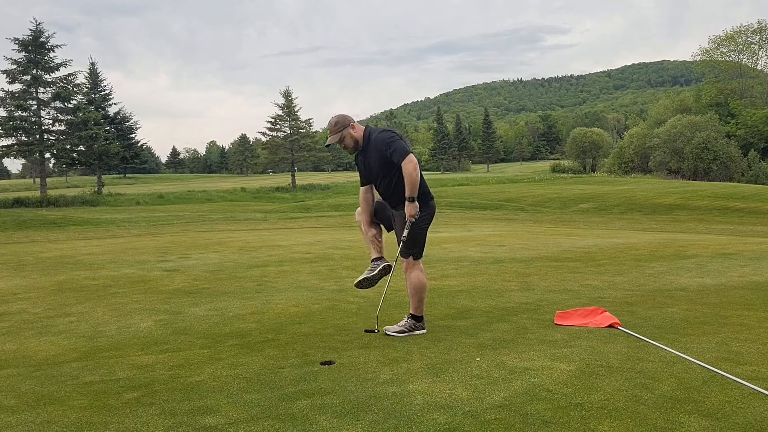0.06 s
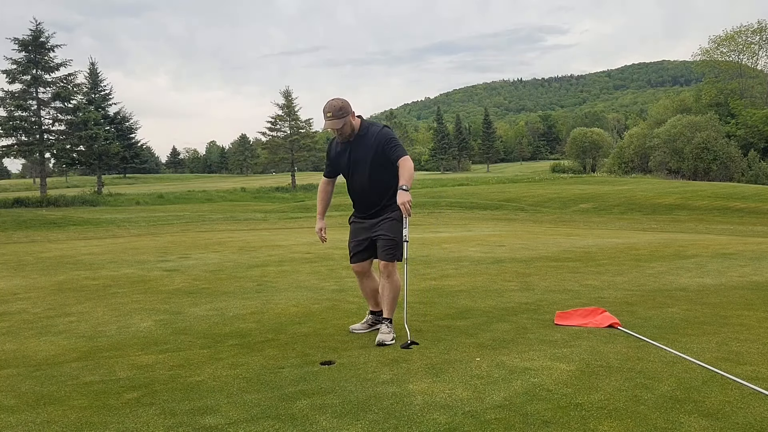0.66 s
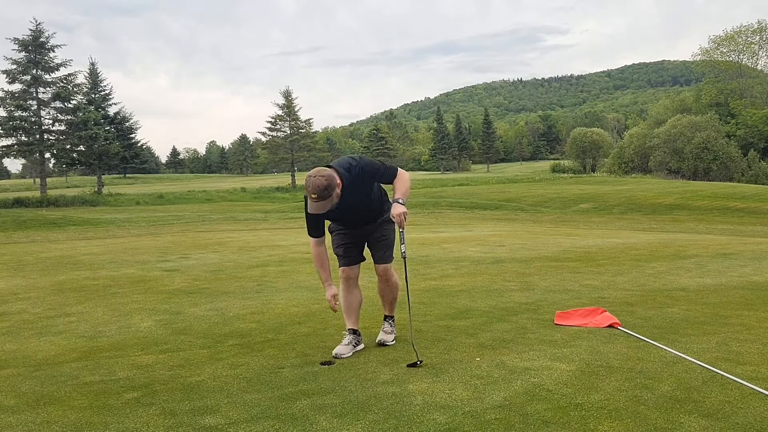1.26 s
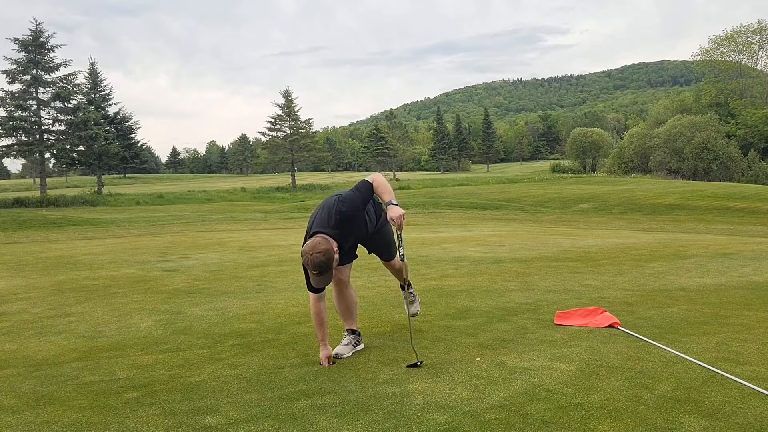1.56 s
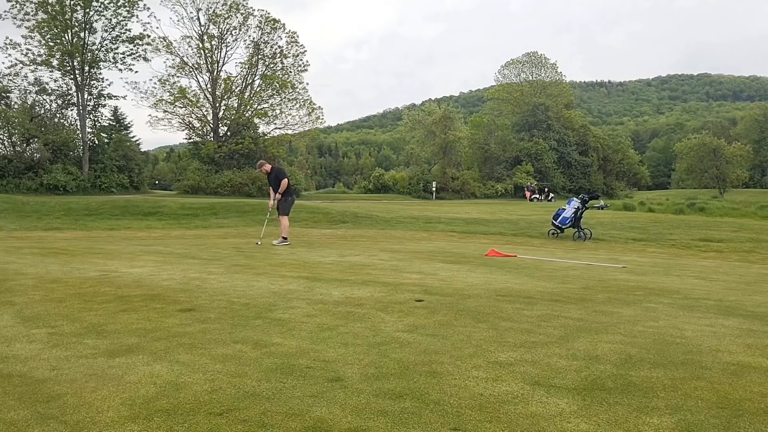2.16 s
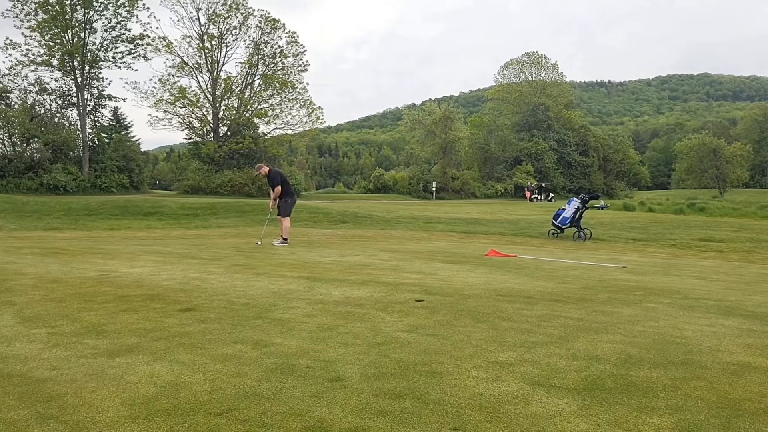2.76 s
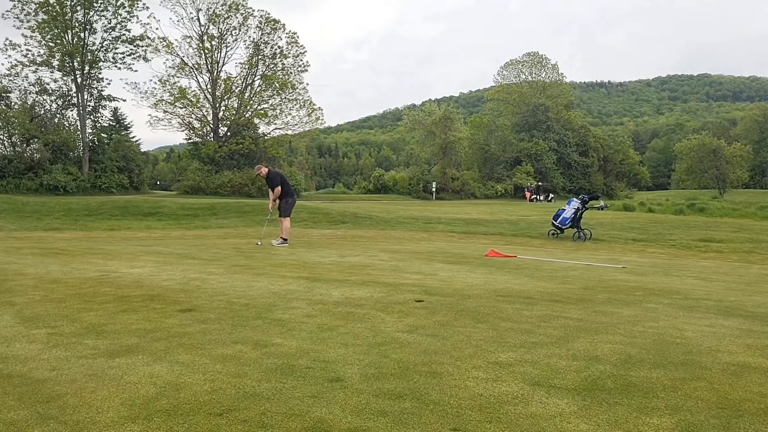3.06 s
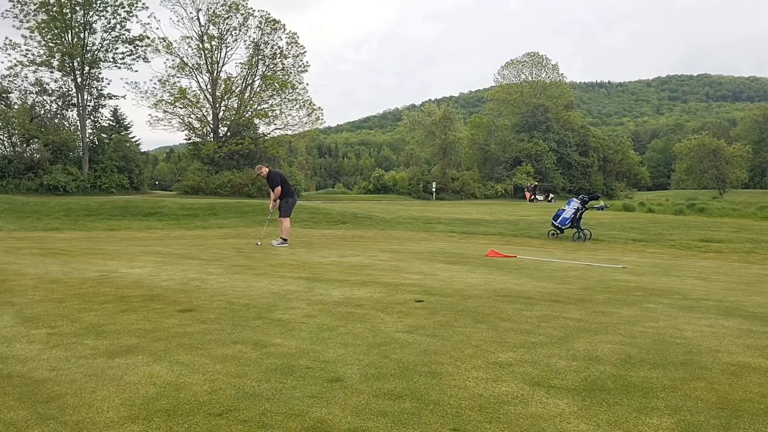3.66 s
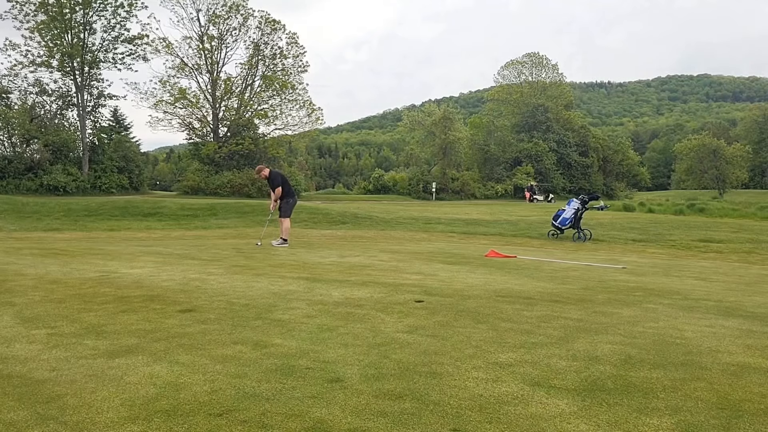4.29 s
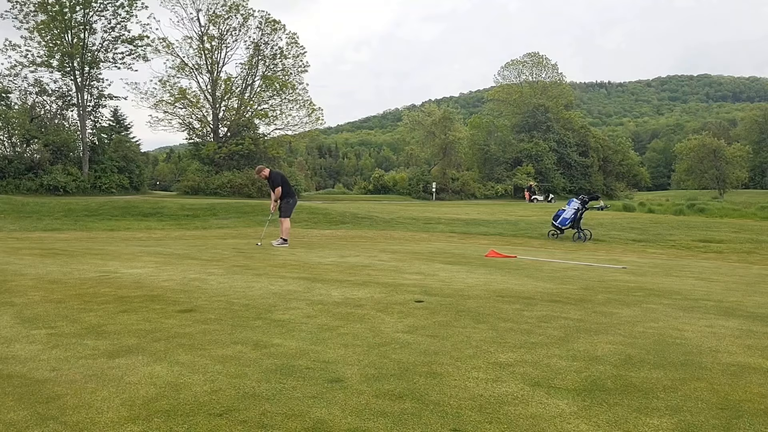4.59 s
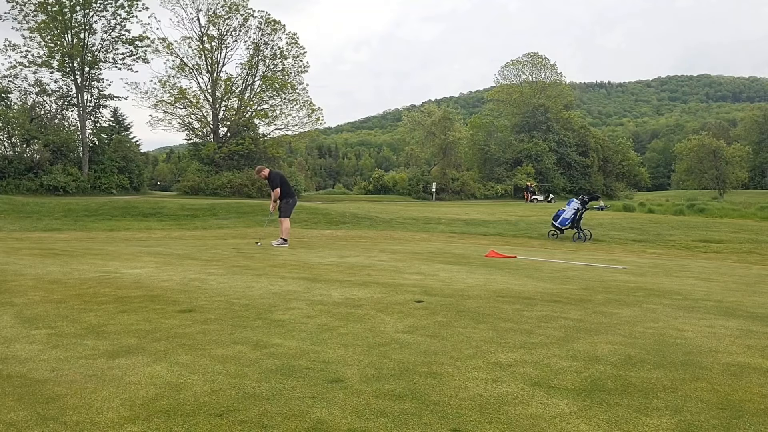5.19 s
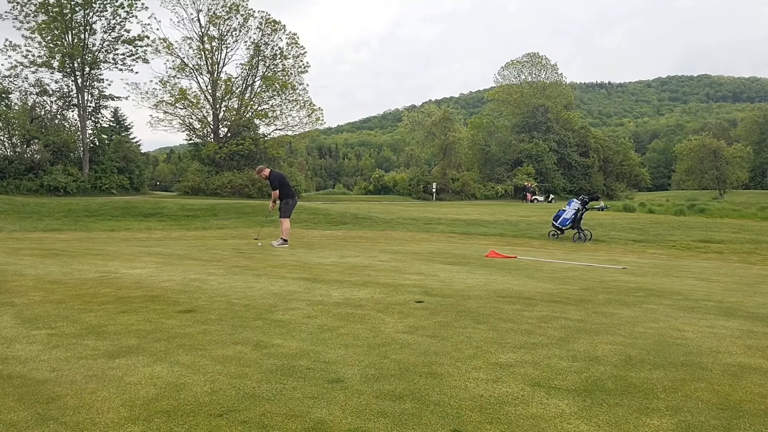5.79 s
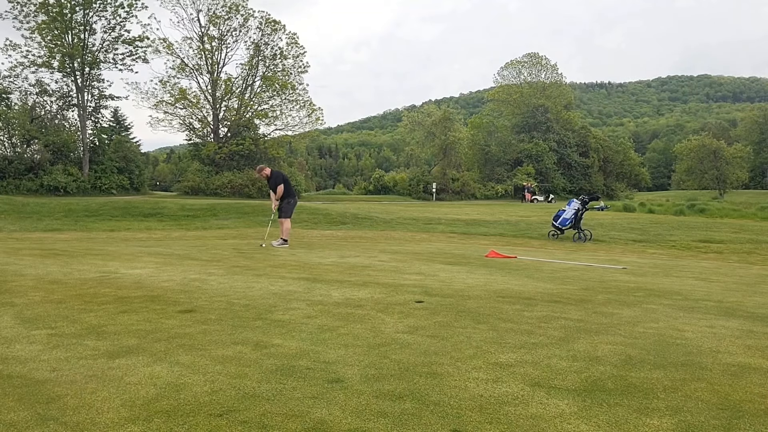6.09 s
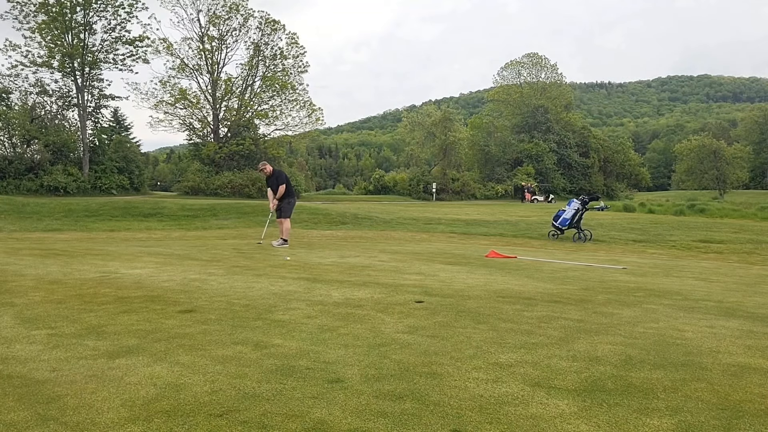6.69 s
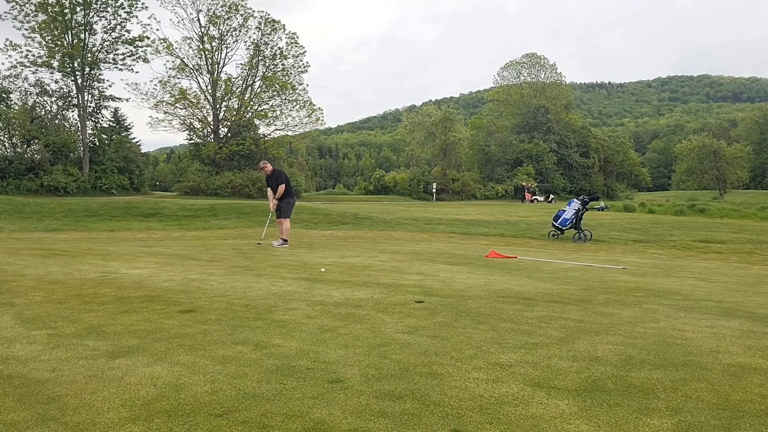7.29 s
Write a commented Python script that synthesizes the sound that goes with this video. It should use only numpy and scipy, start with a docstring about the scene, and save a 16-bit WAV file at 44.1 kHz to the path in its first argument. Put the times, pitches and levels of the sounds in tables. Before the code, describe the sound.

A golf ball drops into the cup right at the start and rattles with quick, hollow knocks that fade by 0.7 seconds, then rolls faintly to rest. Behind it are a distant mower's low hum, soft open air and a far, falling bird call.

At about 1.6 seconds the sound cuts out for an instant and returns at another outdoor spot. From here to the end, wind rumbles on the microphone with occasional low thumps. Songbirds sing high chips and slurred notes, with a quick trill and repeated pips from 2.6 to 3.5 seconds. A falling whistle comes near 4 seconds, then only faint, distant song.

At about 6.1 seconds a putter clicks once against the ball, short and slightly dull. Three raspy scolding calls follow between 6.3 and 7 seconds, and another falling whistle sounds around 7.3 seconds.

```python
"""A golf green, heard from two spots with a moment of silence between them. At the first a ball rattles
to rest against the cup's liner, over the hum of a distant mower and a far, falling bird call.
At the second, songbirds whistle, trill and scold from the trees, whose leaves scatter the sound,
wind eddies buffet the microphone, and a putter clicks once against the ball."""
import sys
import numpy as np
from scipy import signal
from scipy.fft import rfft, irfft
from scipy.io import wavfile
from scipy.ndimage import uniform_filter1d

SR = 44100
rng = np.random.default_rng(int(sys.argv[2]) if len(sys.argv) > 2 else 0)


def persist_wave(psi):
    """Save psi, clipped to +-1, as 16-bit WAV."""
    counts = np.round(np.clip(psi, -1, 1) * 32767).astype(np.int16)
    wavfile.write(sys.argv[1], SR, np.atleast_2d(counts).T)


N = 328545

# a repeated syllable, two low pips and then a thin falling note: start_s, pip_db, thin_note_db
SYLLABLE_BEATS = [(2.625, -55.5, -70.5), (2.733, -54.5, -71), (2.845, -55, -68), (2.959, -60.5, -74.5),
                  (3.067, -60.5, -67.5), (3.179, -63, -71)]


def from_db(db):
    """Decibels to gain."""
    return 10 ** (np.asarray(db) / 20)


def unit_rms(x):
    """Scale to unit power."""
    return x / np.sqrt(np.mean(x ** 2) + 1e-20)


def at_hz(points, hz):
    """Read a curve on a log-frequency axis."""
    point_hz, value = np.transpose(points)
    return np.interp(np.log(np.maximum(hz, 1)), np.log(point_hz), value)


def band(x, low_hz, high_hz):
    """Gentle band-pass."""
    edges_hz = [low_hz, min(high_hz, SR / 2 - 100)]
    return signal.sosfilt(signal.butter(2, edges_hz, "band", fs=SR, output="sos"), x)


def dull(x, cutoff_hz):
    """Roll off the treble."""
    return signal.sosfilt(signal.butter(4, cutoff_hz, fs=SR, output="sos"), x)


def drift(rate_hz, size=N):
    """A random wander, gliding between values of spread 1."""
    return np.interp(np.arange(size) * rate_hz / SR, np.arange(4096), rng.standard_normal(4096))


def place(out, start_s, sound, pan_db=0, lag_ms=0):
    """Mix in a mono sound; positive pan is louder on the left, positive lag reaches the left later."""
    for channel, sign in enumerate((1, -1)):
        start = max(round((start_s + sign * lag_ms / 2000) * SR), 0)
        part = sound[:max(N - start, 0)]
        out[channel, start:start + len(part)] += part * from_db(sign * pan_db / 2)


def struck(modes):
    """Decaying sines set off by one blow."""
    t = np.arange(SR // 10) / SR
    return sum(from_db(db - 60 * t / t60) * np.sin(2 * np.pi * hz * t) for hz, db, t60 in modes)


def rasp(length_s, low_hz, high_hz, taper):
    """A burst of noise inside one resonance, with soft ends."""
    n = int(length_s * SR)
    noise = rng.standard_normal(n + SR // 10)
    rough = band(band(noise, low_hz, high_hz), low_hz, high_hz)[-n:]
    return unit_rms(rough) * signal.windows.tukey(n, taper)


def whistle(hz, waver=0.0029, flicker_db=3.5, taper=0.43, third=0):
    """A bird's slightly unsteady near-sine on a pitch track; it may carry a third harmonic."""
    n = len(hz)
    phase = 2 * np.pi * np.cumsum(hz * (1 + waver * drift(400, n))) / SR
    tone = np.sin(phase) + third * np.sin(3 * phase)
    return tone * signal.windows.tukey(n, taper) * from_db(flicker_db * drift(150, n))


def slur(length_s, start_hz, middle_hz, end_hz, waver=0.0055, swell_db=6.0):
    """A note that bends smoothly through three pitches and swells as it goes."""
    bend = np.polyfit([0, .5, 1], [start_hz, middle_hz, end_hz], 2)
    along = np.linspace(0, 1, int(length_s * SR))
    return whistle(np.polyval(bend, along), waver) * from_db(swell_db * (2 * along - 1))


def phrase(rows, lag_ms, waver=0.011):
    """A string of slurred notes, each with its own level and pan."""
    out = np.zeros((2, N))
    for start_s, length_s, *pitches_hz, db, pan_db in rows:
        place(out, start_s, from_db(db) * slur(length_s, *pitches_hz, waver), pan_db, lag_ms)
    return out


def trees(x, near_db, near_t60, far_db, far_t60):
    """The sound plus a quick tail scattered by nearby foliage and a longer one from the wood's edge."""
    t = np.arange(SR) / SR
    onset = 1 - np.exp(-t / 0.0052)
    tail = 0
    for db, t60 in ((near_db, near_t60), (far_db, far_t60)):
        scatter = rng.standard_normal((2, SR)) * onset * from_db(-60 * t / t60)
        tail = tail + from_db(db) * unit_rms(scatter) / np.sqrt(SR)
    return x + signal.fftconvolve(x, tail, axes=1)[:, :N]


def air(spectrum):
    """Coloured stereo noise at unit power, narrower in the bass and wide on top."""
    # how alike the two sides are: frequency_hz, correlation
    likeness = [(30, 0.19), (120, 0.53), (300, 0.33), (700, 0.14), (1500, 0), (3000, 0.083), (15000, 0)]
    hz = np.fft.rfftfreq(N, 1 / SR)
    alike = at_hz(likeness, hz)
    mid, side = rfft(rng.standard_normal((2, N)))
    pair = np.sqrt(1 + alike) * mid + np.sqrt(1 - alike) * side * [[1], [-1]]
    return unit_rms(irfft(pair * from_db(at_hz(spectrum, hz)) * (hz > 10), N))


def air_by_cup(level_db=-49.5):
    """A steady, bass-heavy bed of open air."""
    # its colour: frequency_hz, relative_db
    spectrum = [(20, -18), (53, -1.5), (86, -3.5), (113, -14), (186, -19.5), (240, -29), (385, -33),
                (480, -31), (1080, -40.5), (4850, -42.5), (8000, -50.5), (11300, -61.5), (12700, -58.5),
                (15000, -61)]
    return from_db(level_db) * air(spectrum)


def air_by_trees(level_db=-73.5):
    """A faint, steady midrange hush."""
    # its colour: frequency_hz, relative_db
    spectrum = [(200, -0.5), (600, 8.5), (1200, 3), (2400, -0.5), (3300, 0.5), (5000, -1), (6300, -6.5),
                (7600, -11), (8600, -20.5), (11000, -20.5), (13000, -14), (15000, -17.5)]
    return from_db(level_db) * air(spectrum)


def mower(waver_hz=2.0, waver_db=3.7):
    """Low engine orders carry across the course, wavering on the way."""
    # engine orders: pitch_hz, level_db
    orders = [(64.6, -59), (107.7, -53.5), (129.2, -58.5), (156.1, -65)]
    out, t = np.zeros((2, N)), np.arange(N) / SR
    for hz, db in orders:
        phase = 2 * np.pi * (hz * t + waver_hz * np.cumsum(drift(7.71)) / SR)
        place(out, 0, np.sqrt(2) * from_db(db + waver_db * drift(9.15)) * np.sin(phase))
    return out


def wind(rumble_swing_db=3.0, flutter_swing_db=4.0):
    """Eddies rumble and flutter on each microphone port; the strongest hit as single low thumps."""
    # the wind's strength: time_s, rumble_db, flutter_db
    strength = [(1.7, -43.5, -61.5), (1.95, -41, -60.5), (2.55, -44.5, -62.5), (2.7, -45.5, -64.5),
                (3.5, -47.5, -70.5), (3.9, -45.5, -66.5), (4.17, -46.5, -66.5), (4.27, -42, -58.5),
                (4.47, -42.5, -57), (4.82, -43.5, -59.5), (5.03, -36.5, -59), (5.25, -43, -65),
                (5.62, -37.5, -61.5), (5.95, -46, -60.5), (6.08, -38.5, -69), (6.6, -42, -61),
                (7.25, -42, -66.5), (7.4, -38.5, -61)]
    # the colour of each layer: frequency_hz, relative_db
    rumble_spectrum = [(11, -45), (18, -15), (48, 0.5), (75, 0), (126, -3), (260, -39), (340, -49.5),
                       (570, -120)]
    flutter_spectrum = [(90, -17.5), (170, 6), (250, -3.5), (400, -11.5), (700, -19), (1400, -52.5),
                        (3000, -61)]
    # sharp buffets: peak_s, level_db, pan_db
    buffets = [(2.577, -29, -4), (2.848, -38, -7), (3.08, -32, -1), (3.385, -36.5, 5), (4.284, -32, -4),
               (4.65, -35.5, 9), (4.998, -39, 11.5), (6.023, -38.5, 15), (7.212, -37.5, 15)]
    # gusts that hum briefly: start_s, length_s, centre_hz, width_hz, level_db
    gusts = [(1.86, 0.12, 316, 50, -65), (2.23, 0.18, 145.6, 50, -49), (2.34, 0.11, 184, 60, -49)]
    time_s, *levels = np.transpose(strength)
    rumble_db, flutter_db = (np.interp(np.arange(N) / SR, time_s, level) for level in levels)
    eddies = air(rumble_spectrum)
    eddies /= np.sqrt(uniform_filter1d(np.mean(eddies ** 2, axis=0), size=SR // 10))  # even out
    out = eddies * from_db(rumble_db + rumble_swing_db * np.array([drift(25), drift(25)]))
    out += air(flutter_spectrum) * from_db(flutter_db + flutter_swing_db * drift(50))
    t = np.arange(-SR // 25, SR // 25) / SR
    for peak_s, db, pan_db in buffets:
        thump = np.exp(-(t / 0.015) ** 2) * np.sin(2 * np.pi * rng.uniform(66.5, 76) * t)
        place(out, peak_s + t[0], from_db(db) * thump, pan_db)
    for start_s, length_s, hz, width_hz, db in gusts:
        hum = rasp(length_s, hz - width_hz / 2, hz + width_hz / 2, taper=0.73)
        place(out, start_s, from_db(db) * hum)
    return out


def chatter(spread_db=1.5, slot_s=.01):
    """Birds deep in the wood slip in short slurs at random, heard only as scattered sound."""
    # how busy the wood is: time_s, notes_per_s, level_db
    activity = [(1.7, 64, -86), (3.7, 62, -88.5), (3.95, 90, -81), (4.35, 94, -80), (4.75, 95, -89)]
    time_s, notes_per_s, level_db = np.transpose(activity)
    out, slots = np.zeros((2, N)), np.arange(0, N / SR, slot_s)
    for start_s, (chance, pitch, bend, size) in zip(slots, rng.random((len(slots), 4))):
        if chance < np.interp(start_s, time_s, notes_per_s, left=0) * slot_s:
            hz, glide = 3100 * 1.65 ** pitch, np.copysign(.1, bend - .5)
            db = np.interp(start_s, time_s, level_db) + spread_db * (2 * size - 1)
            place(out, start_s, from_db(db) * slur(.03, hz * (1 + glide), hz, hz * (1 - glide)))
    return trees(out, -2, .2, -2, .5) - out


def far_song(start_s=4.153, period_s=.144, repeats=4, peak_s=4.38, fade_s=.3, fade_db=5):
    """A far bird see-saws between two notes, swelling and fading; faint lone notes follow."""
    # falling and rising note: after_s, length_s, start_hz, middle_hz, end_hz, level_db, pan_db
    note_pair = [(-.004, .024, 5300, 4900, 4450, -69.5, -1.5), (0.076, .03, 4150, 4400, 5000, -75, 3)]
    # lone notes: start_s, length_s, start_hz, middle_hz, end_hz, level_db, pan_db
    lone_notes = [(5.848, .06, 3650, 3440, 3320, -77.5, -6.5), (5.916, .08, 3150, 2890, 2820, -78.5, -6.5)]
    seesaw = []
    for k in range(repeats):
        for after_s, *shape, db, pan_db in note_pair:
            note_s = start_s + k * period_s + after_s
            softer_db = fade_db * ((note_s - peak_s) / fade_s) ** 2
            seesaw.append((note_s, *shape, db - softer_db, pan_db))
    return trees(phrase(seesaw + lone_notes, lag_ms=-0.03), -6, .15, -7, 1.2)


def far_call(echo_s=0.195, echo_db=-10, echo_cut_hz=1170):
    """A hoarse call slides down to a firm low note; the wood's edge sends it back twice, dulled."""
    # the call's notes: start_s, length_s, start_hz, middle_hz, end_hz, level_db, pan_db
    falling_notes = [(0.462, 0.067, 1680, 1570, 1540, -64, -1), (0.515, 0.058, 1680, 1565, 1560, -62, 2),
                     (0.538, 0.031, 1440, 1440, 1470, -63, -1), (0.563, 0.055, 1310, 1260, 1225, -65.5, -3),
                     (0.585, 0.052, 1450, 1420, 1480, -70, -2), (0.632, 0.048, 1160, 1135, 1140, -61, -3),
                     (0.678, 0.0266, 980, 1120, 1130, -57.5, -1), (0.648, 0.064, 1470, 1445, 1430, -70, 0)]
    call = phrase(falling_notes, lag_ms=-.06, waver=.021)
    echo = dull(call.mean(axis=0), echo_cut_hz)
    for trip in (1, 2):
        place(call, trip * echo_s, from_db(trip * echo_db) * echo)
    return trees(call, -7, 0.18, -11, 0.61)


def long_whistles(sink_s=.135, echo_s=0.27, echo_db=-15):
    """Pure whistles fall fast and level off, broken into swells; the wood's edge returns a late smear."""
    # sinking whistles: start_s, length_s, start_hz, resting_hz, pan_db
    glides = [(3.845, .37, 4800, 3130, -6.5), (7.262, .2, 4600, 3300, -3)]
    # their swells: start_s, length_s, level_db
    swells = [(3.84, 0.097, -69), (3.971, 0.074, -59), (4.069, 0.097, -61.5), (4.143, 0.075, -75),
              (7.265, 0.044, -69), (7.278, 0.042, -54.5), (7.302, 0.054, -61), (7.346, 0.044, -54),
              (7.38, 0.093, -57)]
    out, loudness = np.zeros((2, N)), np.zeros(N + SR)
    for start_s, length_s, db in swells:
        start, n = int(start_s * SR), int(length_s * SR)
        loudness[start:start + n] += from_db(db) * signal.windows.tukey(n, .7)
    for start_s, length_s, start_hz, resting_hz, pan_db in glides:
        t = np.arange(int(length_s * SR)) / SR
        hz = resting_hz + (start_hz - resting_hz) * np.exp(-t / sink_s)
        note = whistle(hz, waver=.003, flicker_db=1.5, taper=.05)
        place(out, start_s, note * loudness[int(start_s * SR):][:len(t)], pan_db, lag_ms=.08)
    smear = trees(out, -3, .4, -3, 1.0) - out
    echo = np.pad(smear, ((0, 0), (int(echo_s * SR), 0)))[:, :N]
    return trees(out, -16, .06, -17, .5) + from_db(echo_db) * echo


def paired_pips(start_hz=3030, end_hz=2860, length_s=.025, spacing_s=.026, accent_db=2.5):
    """Before each thin falling note, the same bird sings two soft-edged, drooping pips, never quite at the same
    pitch."""
    out = np.zeros((2, N))
    droop_hz = np.linspace(start_hz, end_hz, int(length_s * SR))
    for start_s, db, _ in SYLLABLE_BEATS:
        for after_s, pip_db in ((0, db), (spacing_s, db + accent_db)):
            detune = 1 + 0.0051 * rng.standard_normal()
            pip = whistle(droop_hz * detune, flicker_db=1.5, taper=.8)
            place(out, start_s + after_s, from_db(pip_db) * pip, pan_db=-7, lag_ms=0.38)
    return trees(out, -8, 0.18, -16.5, 0.62)


def scolding(spread=1.226, octave_db=-31, flutter_db=3, low_rasp_hz=3300):
    """Each harsh call is three short rasps with a faint octave above and a low rasp in the middle."""
    # the calls: start_s, centre_hz, main_db, last_db, low_rasp_after_s, low_rasp_db
    calls = [(6.35, 6000, -61, -63.5, 0.023, -68), (6.564, 5650, -56.5, -56.5, 0.022, -59.5),
             (6.874, 5400, -56, -62.5, 0.035, -61)]
    out = np.zeros((2, N))
    for start_s, hz, main_db, last_db, low_after_s, low_db in calls:
        low_hz, high_hz = hz / spread / 1.08, hz * spread
        lead_in, main, last = (0, .016, main_db - 7), (.023, .019, main_db), (.063, .019, last_db)
        for after_s, length_s, db in (lead_in, main, last):
            pulse = rasp(length_s, low_hz, high_hz, taper=0.33)
            pulse += from_db(octave_db) * rasp(length_s, 2 * low_hz, 2 * high_hz, taper=.42)
            pulse = unit_rms(pulse * from_db(flutter_db * drift(500, len(pulse))))
            place(out, start_s + after_s, from_db(db) * pulse, pan_db=-1.6, lag_ms=.16)
        low_rasp = rasp(0.012, low_rasp_hz / spread, low_rasp_hz * spread, taper=0.18)
        place(out, start_s + low_after_s, from_db(low_db) * low_rasp, pan_db=-2.5, lag_ms=0.18)
    return trees(out, -5.5, 0.14, -20, 0.5)


def chips():
    """Each short chip shoots up to its top pitch and drops back more softly."""
    # the chips: start_s, length_s, top_hz, level_db
    chip_notes = [(1.717, 0.016, 5260, -51), (1.916, 0.026, 5620, -61.5), (2.102, 0.016, 5150, -47.5),
                  (2.566, 0.014, 5330, -52)]
    # one chip's contour: length_share, pitch_ratio, relative_db
    contour = [(0, .77, -10), (.35, .88, 1), (.65, 1, 2), (1, .74, -13)]
    length_share, pitch_ratio, contour_db = np.transpose(contour)
    out = np.zeros((2, N))
    for start_s, length_s, top_hz, db in chip_notes:
        along = np.linspace(0, 1, int(length_s * SR))
        hz = top_hz * np.interp(along, length_share, pitch_ratio)
        note = whistle(hz, waver=.012, flicker_db=3, taper=0.14)
        envelope = from_db(db + np.interp(along, length_share, contour_db))
        place(out, start_s, note * envelope, pan_db=-3, lag_ms=-0.24)
    return trees(out, -10, .08, -18, .4)


def trill(late_from_s=3.3, flick_after_s=.024, flick_db=-13, third_db=-33, late_third_db=-25):
    """One arched note repeated; the late ones are a little reedier and end in a steep downward flick."""
    # the run of notes: start_s, pitch_hz, level_db
    run = [(2.605, 4540, -60), (2.685, 4600, -58), (2.761, 4400, -59), (2.856, 4320, -66),
           (2.939, 4290, -71.5), (3.023, 4280, -71.5), (3.107, 4280, -61), (3.192, 4310, -61.5),
           (3.274, 4340, -61.5), (3.356, 4300, -63), (3.444, 4300, -66.5)]
    # one note's arch: after_s, pitch_ratio, relative_db
    arch = [(0, .87, -12), (.005, .93, 0), (.014, .96, 1), (.022, 1.03, 1.5), (.027, .88, -7),
            (.033, .68, -16)]
    after_s, pitch_ratio, arch_db = np.transpose(arch)
    out, t = np.zeros((2, N)), np.arange(int(after_s[-1] * SR)) / SR
    for start_s, pitch_hz, db in run:
        late = start_s > late_from_s
        hz = pitch_hz * np.interp(t, after_s, pitch_ratio)
        third = from_db(late_third_db if late else third_db)
        note = whistle(hz, waver=0.0068, flicker_db=3, taper=0.14, third=third)
        envelope = from_db(db + np.interp(t, after_s, arch_db))
        place(out, start_s, note * envelope, pan_db=1.5, lag_ms=.02)
        if late:
            place(out, start_s + flick_after_s, from_db(db + flick_db) * slur(0.01, 6500, 5200, 3600))
    return trees(out, -17, .1, -23, .5)


def songbirds(thin_after_s=.068, buzz_fade_db=13):
    """The near song: slurs and chips, a buzz, a trill crossed by thin falling notes, a flourish."""
    # slurred notes: start_s, length_s, start_hz, middle_hz, end_hz, level_db, pan_db
    song = [(1.646, 0.077, 8020, 7020, 5670, -57.5, -3.5), (1.928, 0.074, 3410, 3830, 3936, -46, -2.5),
            (2.039, 0.063, 7850, 6830, 5450, -55.5, -5.5), (2.198, 0.059, 5380, 5060, 4950, -62, -3),
            (2.236, 0.064, 3490, 3990, 4440, -52.5, -3), (2.509, 0.053, 6000, 6470, 7200, -59, -4),
            (3.539, 0.053, 3525, 3936, 4700, -52, -2), (3.588, 0.025, 3550, 3650, 3850, -58.5, -5),
            (3.621, 0.032, 6020, 6800, 7280, -58.5, -3.5), (3.65, 0.03, 4200, 4300, 4930, -68, 1),
            (3.765, 0.025, 3240, 3300, 3100, -69, -6), (3.79, 0.011, 7900, 5770, 3830, -73, 4),
            (4.752, 0.026, 7670, 7160, 7650, -78, 10), (6.21, 0.049, 7870, 7030, 7580, -73.5, 7)]
    # fading buzzes: start_s, length_s, centre_hz, width_hz, start_db
    buzzes = [(2.28, 0.15, 4710, 740, -58), (2.284, 0.18, 5650, 397, -65), (3.581, 0.084, 4600, 1100, -66),
              (3.901, 0.042, 6000, 3250, -69)]
    out = phrase(song, lag_ms=-.25) + chips() + trill()
    for start_s, _, db in SYLLABLE_BEATS:
        thin_note = slur(0.018, 7970, 7630, 6460)
        place(out, start_s + thin_after_s, from_db(db) * thin_note, pan_db=-4, lag_ms=-.25)
    for start_s, length_s, hz, width_hz, db in buzzes:
        buzz = rasp(length_s, hz - width_hz / 2, hz + width_hz / 2, taper=0.12)
        fade = from_db(db - np.linspace(0, buzz_fade_db, len(buzz)))
        place(out, start_s, buzz * fade, pan_db=-2, lag_ms=-0.21)
    treble = band(out, 5630, 12000)  # the leaves scatter the highest notes most
    return trees(out, -11, .14, -18, .6) + trees(treble, -2.5, .15, -20, .5) - treble


def putt(tock_cut_hz=1330, ring_band_hz=(2400, 9000)):
    """The ball's soft cover gives a dull tock, the putter head a weaker high ring."""
    # the stroke: start_s, level_db
    strokes = [(6.1215, -38.5)]
    # three modes of the ball, then those of the putter head: pitch_hz, relative_db, t60_s
    modes = [(480, -3.5, .009), (850, -3, .004), (1100, -2, .0055), (2950, -9, .0055), (4050, -13, .012),
             (5400, -21, .006), (6600, -26, .008), (9450, -37, .01)]
    tock = dull(struck(modes[:3]), tock_cut_hz)
    ring = band(struck(modes[3:]), *ring_band_hz)
    out = np.zeros((2, N))
    for start_s, db in strokes:
        place(out, start_s, from_db(db) * (tock + ring), lag_ms=0.086)
    return trees(out, -8.5, .1, -16, .6)


def ball_in_cup(dulling=0.3, contact_s=.00015, contact_s_per_db=.00005, roll_hz=381, roll_width_hz=84):
    """The ball rattles against the liner sunk in the turf, then rolls; soft knocks are rounder, duller."""
    # knocks, each pitched by the spot struck: start_s, level_db, pitch_hz
    knocks = [(0.015, -45.5, 367), (0.057, -35.5, 376), (0.111, -41.5, 414), (0.215, -38, 374),
              (0.291, -43, 390), (0.343, -41.5, 363), (0.384, -43, 385), (0.425, -43, 390),
              (0.479, -41.5, 380), (0.517, -47.5, 385), (0.55, -46.5, 408), (0.583, -49, 363),
              (0.618, -44, 396), (0.646, -53, 400), (0.683, -52.5, 361)]
    # the cup's modes: pitch_ratio, relative_db, t60_s
    cup_modes = [(1, 4.5, 0.04), (1.45, -19.5, 0.033), (1.7, -8, 0.013), (2.2, -11.5, 0.032)]
    # the liner hums as the ball rolls round it: start_s, length_s, level_db
    rolls = [(0.76, 0.086, -71), (0.959, 0.18, -69)]
    out, hardest_db = np.zeros((2, N)), max(db for _, db, _ in knocks)
    for start_s, db, hz in knocks:
        softer_db = hardest_db - db
        tilt_db = rng.normal(2.0, 2.3) - dulling * softer_db
        knock = struck([(hz * ratio, mode_db + tilt_db * (ratio - 1), t60)
                        for ratio, mode_db, t60 in cup_modes])
        rise_s = contact_s + contact_s_per_db * softer_db
        attack = 1 - np.exp(-np.arange(len(knock)) / SR / rise_s)
        place(out, start_s, from_db(db) * band(knock * attack, 366, 790), lag_ms=-0.14)
    for start_s, length_s, db in rolls:
        hum = rasp(length_s, roll_hz - roll_width_hz / 2, roll_hz + roll_width_hz / 2, taper=0.21)
        place(out, start_s, from_db(db) * hum, lag_ms=-0.13)
    return trees(out, -20, 0.11, -19, 1.5)


def scene(leave_s=1.644, arrive_s=1.69):
    """The spot by the cup, a moment of silence, then the spot facing the trees."""
    t = np.arange(N) / SR
    by_cup = ball_in_cup() + mower() + air_by_cup()
    by_trees = putt() + wind() + air_by_trees()
    birds = songbirds() + paired_pips() + far_song() + long_whistles()
    birds += far_call() + chatter() + scolding()
    cup_fader = np.clip((leave_s - t) / .001, 0, 1)
    trees_fader = np.clip(np.minimum(t - arrive_s, t[-1] - t) / .008, 0, 1)
    return cup_fader * (by_cup + birds) + trees_fader * (by_trees + birds)


def record(dry):
    """The top is cut steeply above 15.4 kHz."""
    return signal.sosfilt(signal.ellip(10, .1, 70, 15400, fs=SR, output="sos"), dry)


dry = scene()
out = record(dry)
persist_wave(out)
```